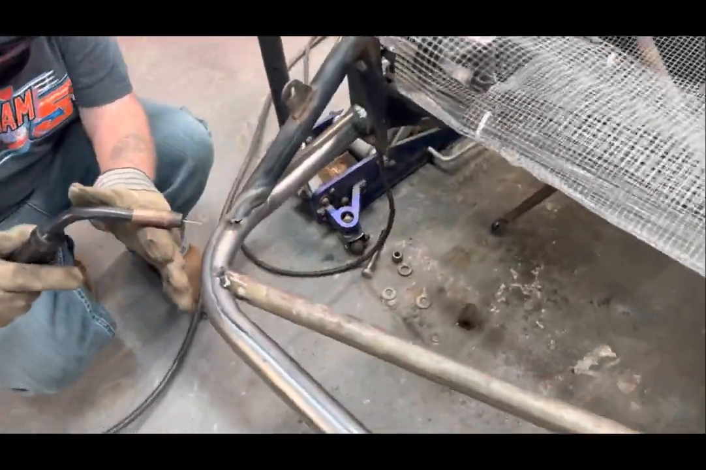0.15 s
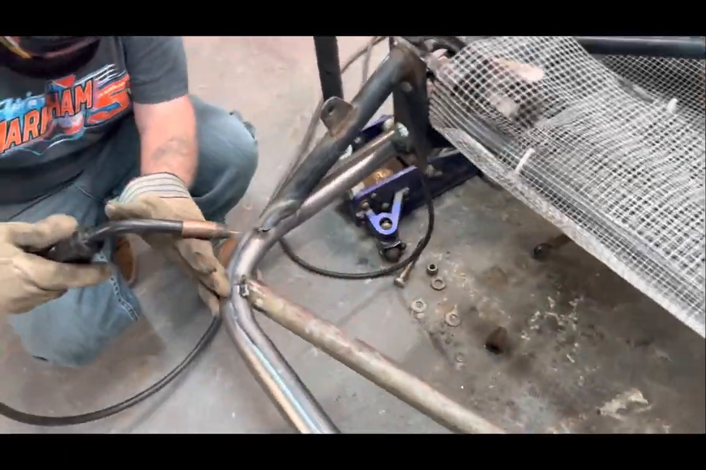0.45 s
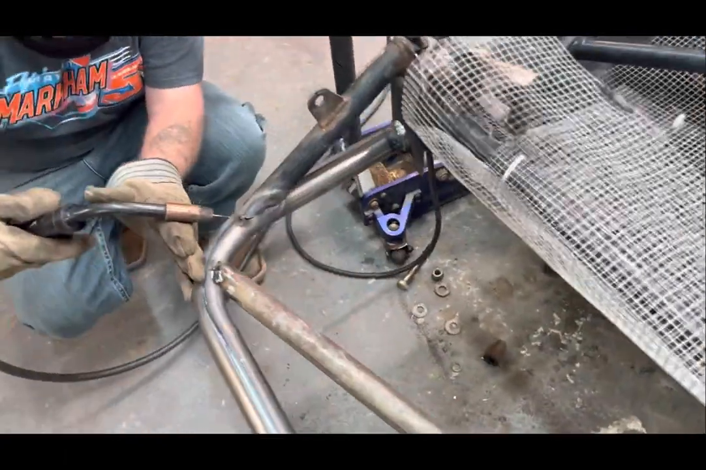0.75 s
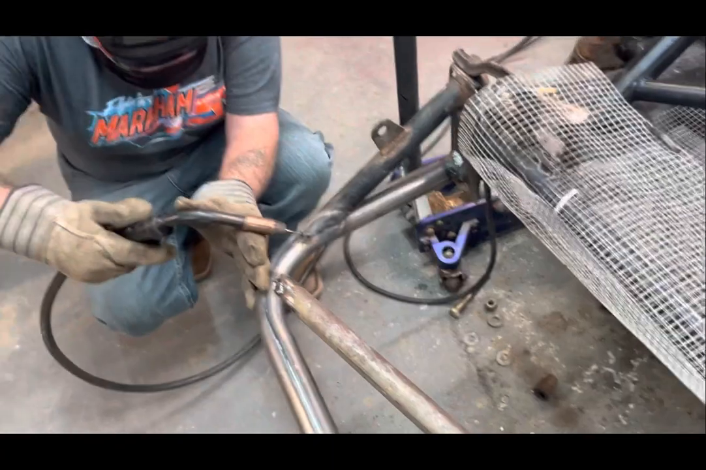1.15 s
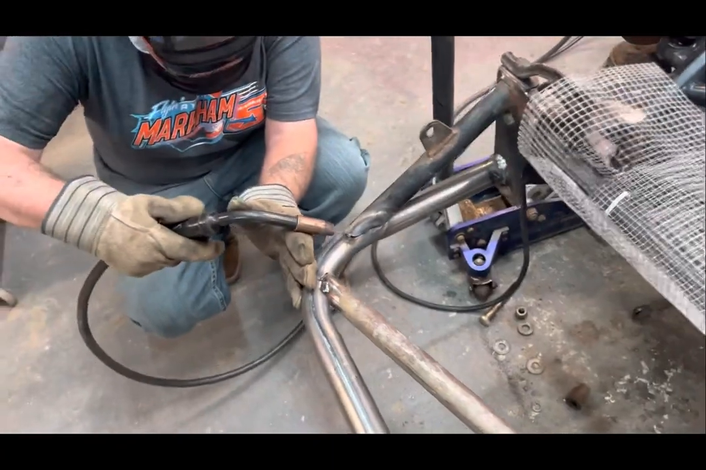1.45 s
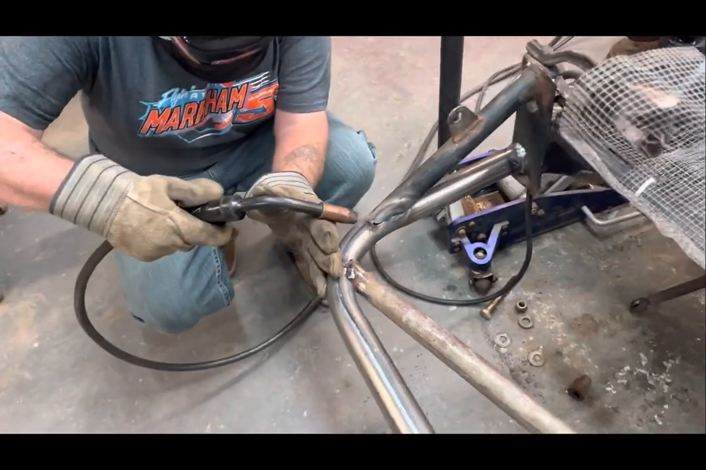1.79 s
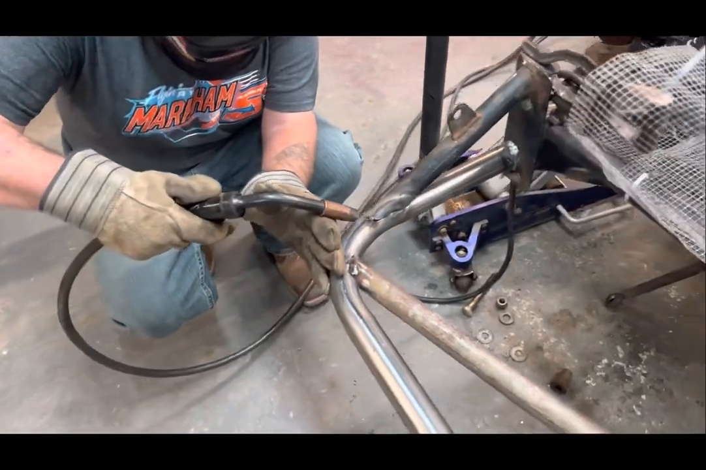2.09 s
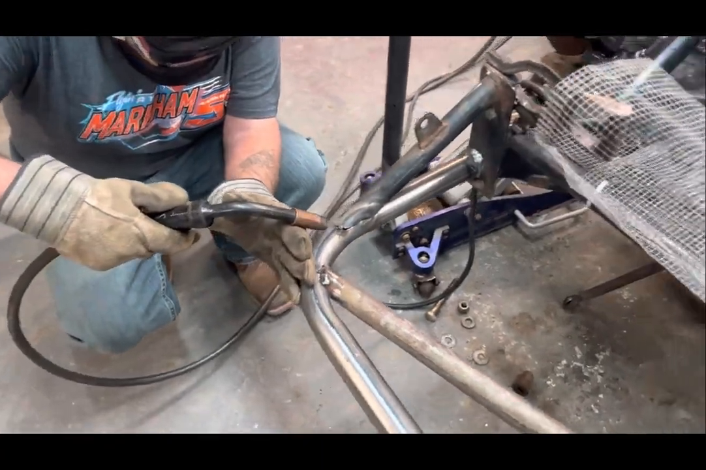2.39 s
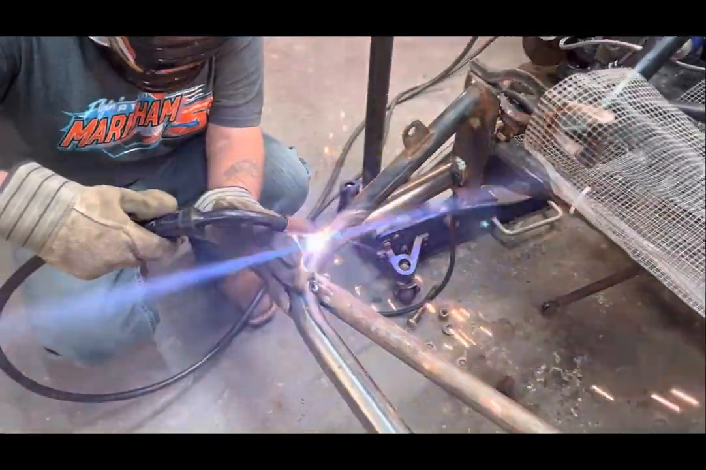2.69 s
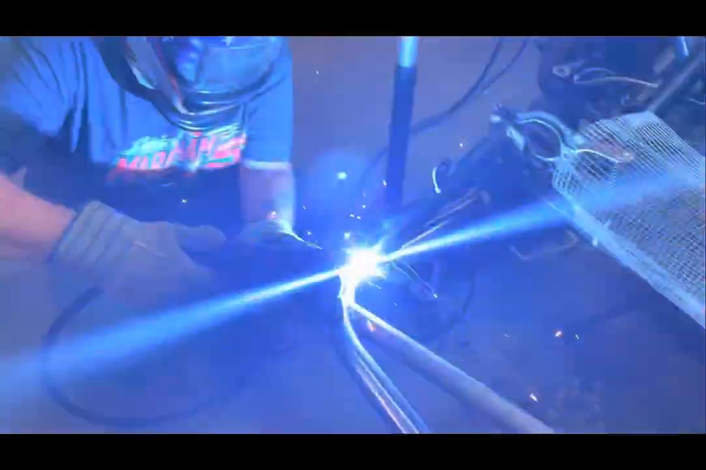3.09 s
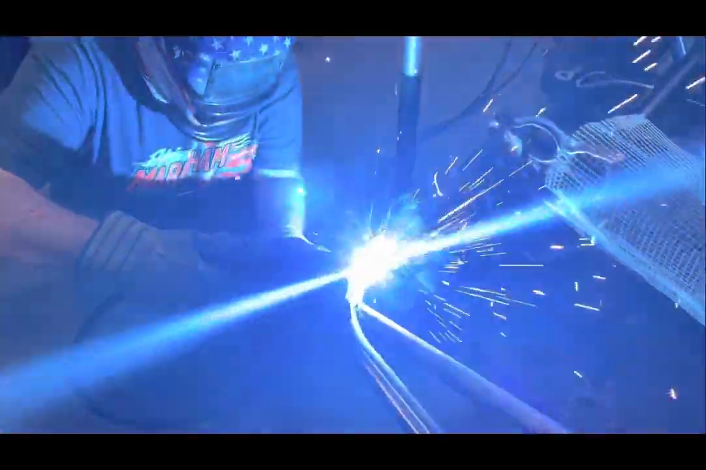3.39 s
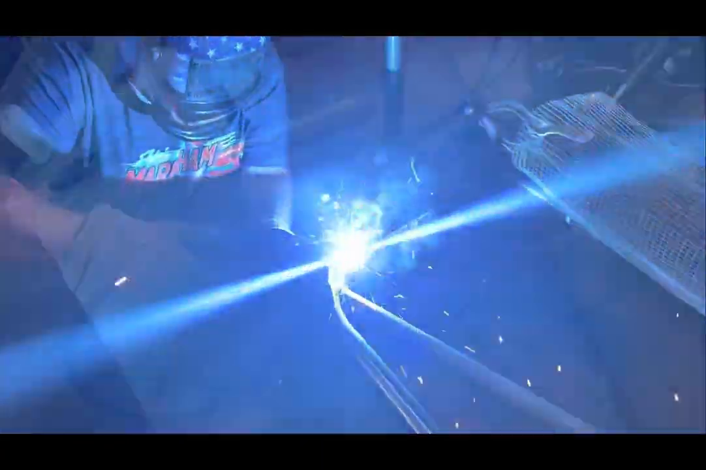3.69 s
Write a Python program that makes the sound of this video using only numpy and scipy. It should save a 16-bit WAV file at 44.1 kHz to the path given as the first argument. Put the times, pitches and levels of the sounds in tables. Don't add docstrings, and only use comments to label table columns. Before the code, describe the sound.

A welding arc on steel tubing, heard close in a small hard workshop. Until 2.5 s, only a low fan and transformer hum, with faint glove scuffs around 0.5-0.8 s and light clinks near 1.5 and 1.7 s. Then a short rough roar, a brief lull, and sizzling with sharp irregular pops from 2.7 s, densest around 2.9, 3.1-3.35 and 3.45-3.7 s, thinning afterward. Low camera-handling thumps; hum ducks.

```python
import sys
import numpy as np
from scipy import signal
from scipy.fft import rfft, irfft
from scipy.io import wavfile
from scipy.ndimage import uniform_filter1d

SR = 44100
rng = np.random.default_rng(int(sys.argv[2]) if len(sys.argv) > 2 else 0)


def attenuation_scalar(level_db):
    decades = np.asarray(level_db, float) / 20
    return 10 ** decades


def persist_wave(psi):
    counts = np.round(np.clip(psi, -1, 1) * 32767).astype(np.int16)
    wavfile.write(sys.argv[1], SR, np.atleast_2d(counts).T)


N = 169785
T = np.arange(N) / SR


def evened(x):
    return x / np.sqrt(np.mean(x ** 2) + 1e-20)


def read(points, hz, column=1):
    table = np.transpose(points)
    return np.interp(np.log(hz + 1), np.log(table[0] + 1), table[column])


def level(curve):
    s, db = np.transpose(curve)
    return attenuation_scalar(np.interp(T, s, db, left=-120, right=db[-1]))


def colour(x, points):
    return irfft(rfft(x) * attenuation_scalar(read(points, np.fft.rfftfreq(N, 1 / SR))), N)


def wander(per_s):
    size = max(int(SR / per_s), 2)
    smooth = uniform_filter1d(rng.standard_normal(N), size)
    return evened(uniform_filter1d(smooth, size))


# frequency in Hz, level in dB per Hz.
FAN_AIR = [(18, -76), (30, -29), (108, -7), (161, -5), (266, -18), (317, -15.5), (550, -18.5), (2870, -33),
           (12000, -62.5), (15600, -103), (22000, -120)]
# frequency in Hz, width in Hz, level in dB.
MACHINE_TONES = [(163, 18.6, -47), (175.6, 18, -51), (311.3, 41, -50), (462, 8.3, -60.5), (659, 53, -54.5),
                 (973, 155, -54.5)]
# frequency in Hz, level in dB, sway in dB.
MAINS_LINES = [(97.5, -49.5, 5.5), (121.7, -40.5, 0.3), (161.8, -41, 2), (321.2, -50.5, 2.5)]
# time in seconds, gain in dB.
HUM_GAIN = [(0, -3), (.8, -1), (1.3, -3), (2.5, -2.5), (2.72, -5.5), (2.77, -16.5), (2.87, -23),
            (2.92, -7.5), (3.05, -11.5), (3.2, -5), (3.52, -19.5), (3.68, -17.5), (3.79, -16.5),
            (3.85, -13)]


def hum():
    air_db, swell_db = -41, .5
    hz = np.fft.rfftfreq(N, 1 / SR)
    swell = attenuation_scalar(air_db + swell_db * wander(9.7))
    out = swell * evened(colour(rng.standard_normal((2, N)), FAN_AIR))
    for tone_hz, width_hz, db in MACHINE_TONES:
        peak = 1 / (1 + (2 * (hz - tone_hz) / width_hz) ** 2)
        out = out + attenuation_scalar(db) * evened(irfft(rfft(rng.standard_normal((2, N))) * peak, N))
    for line_hz, db, sway_db in MAINS_LINES:
        sway = attenuation_scalar(db + 1.5 + sway_db * wander(5.4))
        out = out + sway * np.sin(2 * np.pi * (line_hz * T + rng.random()))
    return out * level(HUM_GAIN)


# start in seconds, rise in seconds, fall in seconds, level in dB.
SCUFF_EVENTS = [
    (0, 0.0062, 0.4, -66.5),
    (.535, 0.0044, 0.047, -58),
    (.59, 0.017, 0.055, -69),
    (.664, .012, .03, -59),
    (0.668, 0.07, 0.15, -51),
    (1.408, 0.012, 0.041, -59),
    (2, .03, 0.055, -73),
    (2.09, .03, 0.078, -71),
    (1.66, 0.0099, 0.17, -63),
    (1.724, .01, 0.069, -65),
]
# frequency in Hz, level in dB per Hz.
RUB_COLOUR = [(2060, -23), (3500, -6.5), (4940, -7), (5800, -7.5), (7350, -5), (12000, -16), (15600, -65),
              (22000, -120)]
# start in seconds, level in dB.
CLINK_EVENTS = [
    (1.482, -57),
    (1.69, -66),
    (1.725, -61),
]
# frequency in Hz, level in dB, 60 dB decay in seconds.
CLINK_MODES = [(5222, -9, .2), (6094, -6, .09), (6200, -13, .08), (6944, -15, .1), (7989, -13, .07),
               (8150, -16, .12), (10550, -20, .05)]


def scuffs():
    click_db, click_s, ring_spread_db = 3, 0.008, 1
    shape = np.zeros(N)
    for s, rise, fall, db in SCUFF_EVENTS:
        onset = np.clip((T - s) / rise, 0, 1)
        shape += attenuation_scalar(db) * onset * np.exp(-np.maximum(T - s - rise, 0) * 2 / fall)
    out = shape * attenuation_scalar(1.0 * wander(150)) * evened(colour(rng.standard_normal((2, N)), RUB_COLOUR))
    grit = np.diff(rng.standard_normal((2, N + 1)))
    for s, db in CLINK_EVENTS:
        age = np.maximum(T - s, 0)
        out = out + attenuation_scalar(db + click_db) * (T > s) * np.exp(-age / click_s) * grit
        flutter, ring = attenuation_scalar(3 * wander(200)), np.zeros(N)
        for f, mode_db, t60 in CLINK_MODES:
            start_db = db + mode_db + rng.normal(0, ring_spread_db)
            ring += attenuation_scalar(start_db - 60 * age / t60) * np.sin(2 * np.pi * f * age)
        out = out + flutter * ring
    return out


# time in seconds, level in dB.
ARC_POWER = [(2.5, -100.5), (2.515, -30.5), (2.6, -31), (2.7, -40.5), (2.72, -38), (2.75, -28.5),
             (2.84, -38), (2.87, -30), (2.98, -35), (3.08, -39.5), (3.12, -35.5), (3.28, -36), (3.38, -29),
             (3.43, -35), (3.5, -28), (3.7, -37.5), (3.8, -37.5), (3.85, -48)]
# frequency in Hz, level in dB per Hz.
SIZZLE_COLOUR = [(200, -50), (500, -15.5), (1200, -10.5), (2800, -5), (6500, -2.5), (9000, -6),
                 (12000, -10), (16000, -1.5)]


def sizzle():
    spit_per_s, spit_spread_db, spit_db, flicker_db = 2500, 2.5, -6, 2
    sizes = attenuation_scalar(spit_spread_db * np.minimum(rng.exponential(1, N), 5))
    spits = sizes * (rng.random(N) < spit_per_s / SR)
    rough = 1 + attenuation_scalar(spit_db) * evened(uniform_filter1d(spits, size=5))
    drive = rng.standard_normal((2, N)) * rough
    return evened(colour(drive, SIZZLE_COLOUR)) * level(ARC_POWER) * attenuation_scalar(flicker_db * wander(140))


# time in seconds, level in dB.
STRIKE_POWER = [(2.508, -67.5), (2.514, -42), (2.532, -34), (2.535, -23), (2.565, -23), (2.585, -42),
                (2.63, -33.5), (2.68, -56.5)]
# frequency in Hz, level in dB per Hz.
ROAR_COLOUR = [(47, -46), (80, -9), (949, -6.5), (1360, -12), (1570, -10), (1820, -12), (2880, -8.5),
               (12000, -24.5), (15600, -48.5), (22000, -120)]


def strike():
    grit_db = 3
    body = evened(colour(rng.standard_normal((2, N)), ROAR_COLOUR)) * attenuation_scalar(grit_db * wander(420))
    return body * level(STRIKE_POWER + [(2.72, -90)])


# time in seconds, peak in dB.
FIRST_RUN = [(2.5759, -10.6), (2.5836, -7.6), (2.6002, -17.5), (2.7189, -13.2), (2.7275, -6.6),
             (2.7492, -19.1), (2.8501, -15.2), (2.8587, -6.7), (2.8685, -16.5), (2.8789, -16.3),
             (2.8895, -7.0), (2.901, -9.9), (2.9078, -8.6), (2.9153, -16.5), (2.9229, -10.4),
             (2.9341, -7.5), (2.9453, -9.5), (2.9582, -8.2), (2.9723, -5.9), (2.9875, -8.6)]
SECOND_RUN = [(3.1051, -8.0), (3.1309, -8.2), (3.1512, -8.6), (3.1652, -7.8), (3.1859, -8.5),
              (3.1958, -7.5), (3.2132, -7.2), (3.2232, -11.5), (3.2324, -8.9), (3.2469, -8.3),
              (3.2541, -7.2), (3.2683, -7.3), (3.2762, -9.0), (3.2922, -18.2), (3.301, -6.1),
              (3.3207, -6.5), (3.3403, -6.8), (3.3568, -18.6), (3.365, -7.0)]
THIRD_RUN = [(3.444, -7.3), (3.4713, -4.2), (3.4912, -8.1), (3.5079, -15.0), (3.5145, -7.6), (3.5341, -8.1),
             (3.5477, -8.3), (3.5698, -10.9), (3.5863, -7.7), (3.5975, -9.8), (3.6094, -9.9), (3.62, -12.8),
             (3.6352, -7.1), (3.6477, -9.6), (3.671, -7.9), (3.688, -7.5), (3.7106, -10.5), (3.7259, -8.5),
             (3.836, -8.7)]
# time in seconds, peak in dB.
NECK_SPITS = [(2.5158, -20), (2.5187, -16), (2.6993, -29), (2.7925, -23), (2.8127, -26), (2.8558, -23),
              (2.8571, -21), (2.8847, -18), (2.8868, -19), (2.9435, -15), (2.9561, -20), (2.97, -18),
              (2.9848, -19), (3.0008, -23), (3.004, -23), (3.014, -23), (3.0641, -30), (3.0834, -29),
              (3.0967, -25), (3.0994, -24), (3.1016, -17), (3.1033, -23), (3.1224, -20), (3.1243, -20),
              (3.1286, -16), (3.1487, -15), (3.15, -19), (3.1629, -18), (3.1812, -14), (3.1832, -16),
              (3.2091, -15), (3.2112, -17), (3.2435, -16), (3.2657, -17), (3.2979, -19), (3.3121, -20),
              (3.3178, -17), (3.3373, -17), (3.3531, -20), (3.4354, -22), (3.4403, -19), (3.4629, -21),
              (3.4688, -18), (3.4879, -15), (3.5318, -19), (3.5686, -21), (3.5813, -22), (3.5841, -21),
              (3.6076, -17), (3.6328, -20), (3.6668, -22), (3.6856, -19), (3.7235, -20), (3.7424, -24),
              (3.8148, -21), (3.8197, -25), (3.8226, -24), (3.8276, -23), (3.8327, -17), (3.8349, -23)]
# delay in seconds, level in dB.
POP_ECHOES = [(0, 0), (.0017, -15), (.0033, -15)]
# frequency in Hz, level in dB.
SNAP_COLOUR = [(120, -5), (300, -8.5), (1200, 0), (3000, 5), (6500, 3.5), (9500, -3), (16500, 3.5)]


def pops():
    neck_s, neck_db, after_s, after_db = .005, -31, 0.002, -26
    pop_s, pop_db, ragged_db = .00012, 8, -23
    spit_softer_db, side_s = -3, .00006
    shape, snaps = np.zeros(N), np.zeros((2, N))
    softer = [(s, db + spit_softer_db) for s, db in NECK_SPITS]
    for s, db in FIRST_RUN + SECOND_RUN + THIRD_RUN + softer:
        at = slice(round((s - .03) * SR), round((s + .03) * SR))
        u = T[at] - s
        before, after = attenuation_scalar(neck_db) * np.exp(u / neck_s), attenuation_scalar(after_db) * np.exp(-u / after_s)
        fizz = np.where(u < 0, before, after)
        ragged = attenuation_scalar(ragged_db) * np.exp(-(u / pop_s) ** 2)
        shape[at] = np.maximum(shape[at], attenuation_scalar(db + pop_db) * (ragged + fizz))
        side = rng.uniform(0.57, 1.62) * side_s
        for late, echo_db in POP_ECHOES:
            left = -np.sinc((u - late) * SR)
            right = .5 * np.sinc((u - late - side) * SR)
            snaps[:, at] += attenuation_scalar(db + pop_db + echo_db) * np.array([left, right])
    return colour(snaps + shape * rng.standard_normal((2, N)), SNAP_COLOUR)


def shorted():
    after_s, width_s, short_db = .0075, .0035, -8
    dip = np.zeros(N)
    for s, db in FIRST_RUN + SECOND_RUN + THIRD_RUN:
        if db > -12:
            dip += np.exp(-((T - s - after_s) / width_s) ** 2)
    return attenuation_scalar(short_db * np.minimum(dip, 1))


# frequency in Hz, 60 dB decay in seconds.
SHOP_DECAY = [(300, 0.37), (2000, 0.23), (14000, 0.06)]


def shop(x):
    size = SR // 2
    signs = rng.choice([-1., 1.], (2, size))
    taps = signs * (rng.random((2, size)) < .05) * (np.arange(size) > 250)
    hz, t, z = signal.stft(taps, SR, nperseg=256)
    fade = attenuation_scalar(-60 * t / read(SHOP_DECAY, hz)[:, None])
    tail = signal.istft(z * fade, SR, nperseg=256)[1]
    return signal.fftconvolve(x, tail / np.linalg.norm(tail[0]), axes=1)[:, :N]


# time in seconds, gain in dB.
HANDLING_GAIN = [(0, 3), (2.7, -0.5), (2.715, 0), (2.73, -14), (2.76, -1.5), (2.84, 2), (2.855, -37),
                 (2.875, -15), (2.9, 5), (2.93, 3.5), (3.0, -3), (3.04, -6), (3.09, -9), (3.1, 5),
                 (3.48, 0.5), (3.487, -15), (3.503, -24), (3.51, 2)]


def handled(arc):
    return arc - (1 - level(HANDLING_GAIN)) * colour(arc, [(1300, -2), (2600, -16)])


# start in seconds, ring in dB, ring in Hz, 60 dB decay in seconds, knock in dB.
GRIP_JOLTS = [(2.592, -27, 59, 0.21, -53), (2.737, -14, 55.4, 0.21, -17.5), (2.812, -29, 48.7, 0.34, -34),
              (2.863, -25, 51.4, 0.14, -27), (2.893, -67, 50, .2, -20.5), (2.913, -12.5, 73, 0.027, -23),
              (2.934, -23, 50, 0.26, -32), (3.045, -28.5, 48, 0.39, -36), (3.09, -41, 46, 0.35, -34.5),
              (3.147, -27, 55.4, 0.053, -58), (3.372, -28.5, 55.6, 0.064, -65), (3.497, -55, 55, 0.09, -31)]


def jolts():
    knock_top_hz, knock_end_hz, knock_drop_s, knock_t60, knock_lead_s = 115, 58, .012, .17, .0055
    snap_turns, snap_s, rattle_db = 0.1, 0.0032, -6
    out = np.zeros((2, N))
    rattle = evened(colour(rng.standard_normal(N), [(60, -30), (150, -9), (450, -13.5), (2000, -28.0)]))
    for s, ring_db, hz, t60, knock_db in GRIP_JOLTS:
        age, early = np.maximum(T - s, 0), np.maximum(T - s + knock_lead_s, 0)
        ring_turns = hz * age + snap_turns * (1 - np.exp(-age / snap_s))
        out -= attenuation_scalar(ring_db - 60 * age / t60) * np.sin(2 * np.pi * ring_turns)
        sweep = (knock_top_hz - knock_end_hz) * knock_drop_s * (1 - np.exp(-early / knock_drop_s))
        knock = attenuation_scalar(-60 * early / knock_t60) * np.sin(2 * np.pi * (knock_end_hz * early + sweep))
        shake = attenuation_scalar(rattle_db) * rattle * np.exp(-((T - s + knock_lead_s) / knock_drop_s) ** 2)
        out += attenuation_scalar(knock_db) * np.array([[1], [-1]]) * (knock + shake)
    stub_s, stub_db, stub_top_hz, stub_fall_hz_per_s, stub_length_s = 2.525, -26, 205.5, 1600, 0.073
    age = np.clip(T - stub_s, 0, stub_length_s)
    stub = np.sin(2 * np.pi * (stub_top_hz * age - .5 * stub_fall_hz_per_s * age ** 2))
    return out + attenuation_scalar(stub_db) * np.sin(np.pi * age / stub_length_s) * stub


# frequency in Hz, phase in radians.
PORT_LEAD = [(60, 0), (950, .7), (2300, 0), (4200, -.5), (5700, -6.28), (7200, -6.3), (11500, -8),
             (13500, -9.4)]
# frequency in Hz, likeness for distant air, likeness for near
LEFT_RIGHT_LIKENESS = [(100, .999, .9), (300, .96, .85), (700, .45, .55), (5100, .35, .5), (5800, .97, .99),
                       (7200, .97, .99), (8500, .85, .75), (14000, .95, .9)]


def ports(pair, column):
    hz = np.fft.rfftfreq(N, 1 / SR)
    same = np.clip(read(LEFT_RIGHT_LIKENESS, hz, column=column), 0, 1)
    turn = np.exp(.5j * read(PORT_LEAD, hz))
    a, b = rfft(pair)
    return irfft(np.array([a * turn, (same * a + np.sqrt(1 - same ** 2) * b) / turn]), N)


# frequency in Hz, level in dB.
DISTANT_COLOUR = [(4600, 0), (4950, -6), (5250, 0), (7200, 1.5), (8800, -3)]


def scene():
    shop_db = -13
    arc = pops() + sizzle() * shorted() + strike()
    arc = handled(arc + attenuation_scalar(shop_db) * shop(arc))
    far = colour(hum() + scuffs(), DISTANT_COLOUR)
    return ports(far, column=1) + ports(arc, column=2) + jolts()


def top_cut(x):
    return signal.sosfilt(signal.butter(12, 17000, fs=SR, output="sos"), x)


def record(dry):
    top_hz, edge_hz, open_db, hold_s = 11900, 16000, -33, .021
    hz = np.fft.rfftfreq(N, 1 / SR)
    limited = 0.85 * np.tanh(dry / 0.62)
    limited = irfft(rfft(limited) * np.clip((edge_hz - hz) / 300 + .5, 0, 1), N)
    top = irfft(rfft(limited.mean(0)) * np.clip((hz - top_hz) / 300 + 1, 0, 1), N)
    loud = 1. * (abs(top) > attenuation_scalar(open_db))
    near = uniform_filter1d(loud, int(hold_s * SR)) > 1e-6
    gate = uniform_filter1d(1. * near, size=64)
    return top_cut(limited - top * (1 - gate))


dry = scene()
out = record(dry)
persist_wave(out)
```